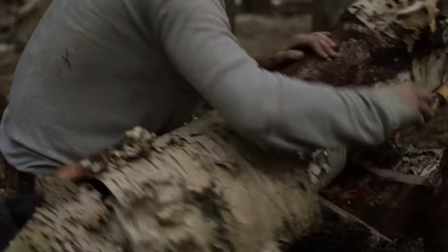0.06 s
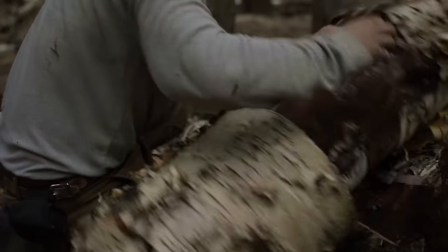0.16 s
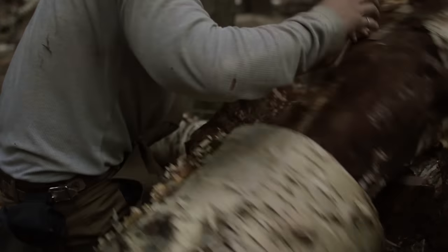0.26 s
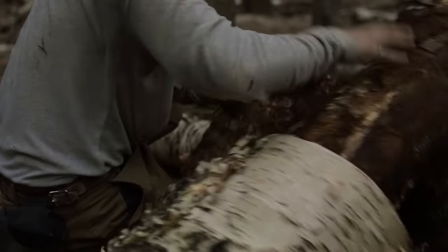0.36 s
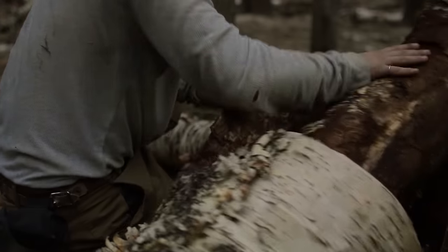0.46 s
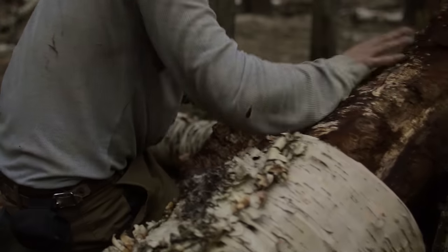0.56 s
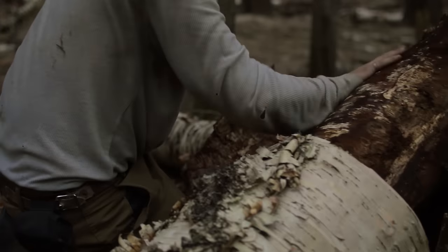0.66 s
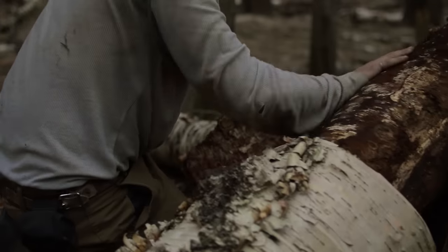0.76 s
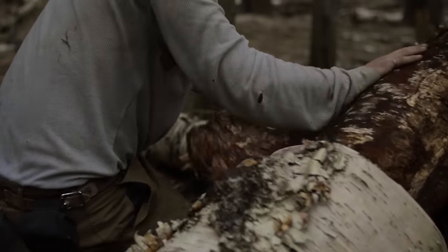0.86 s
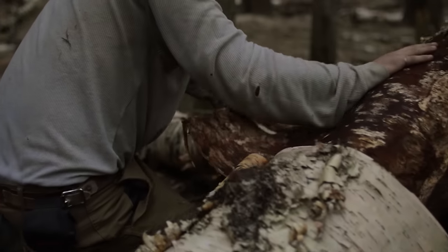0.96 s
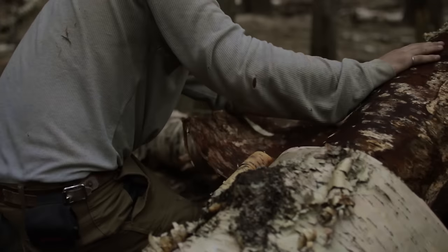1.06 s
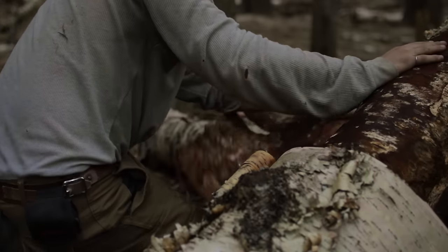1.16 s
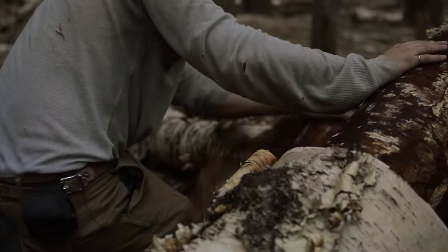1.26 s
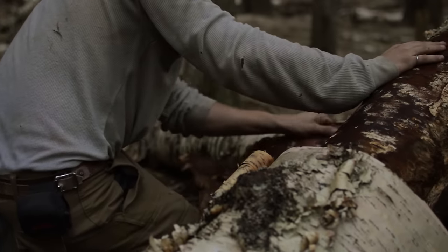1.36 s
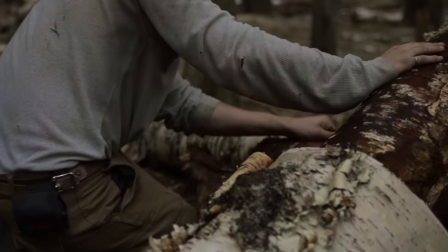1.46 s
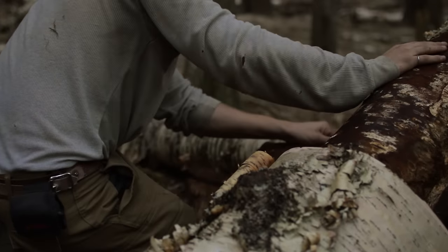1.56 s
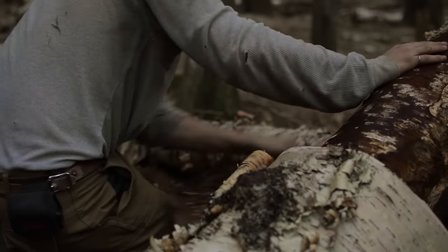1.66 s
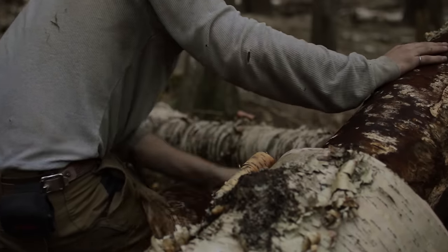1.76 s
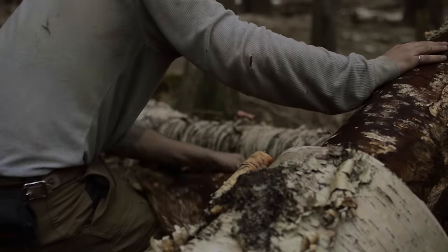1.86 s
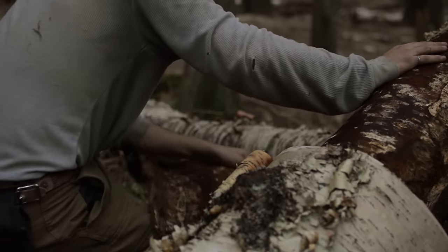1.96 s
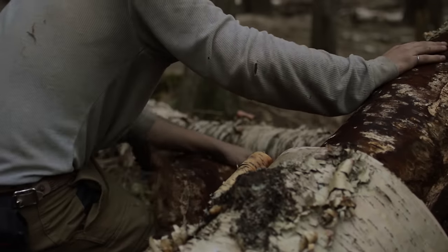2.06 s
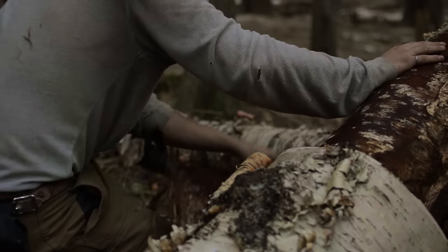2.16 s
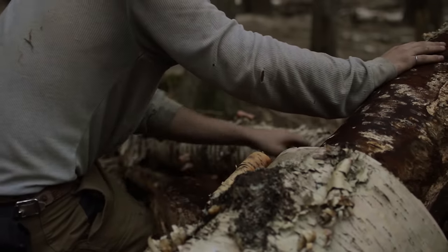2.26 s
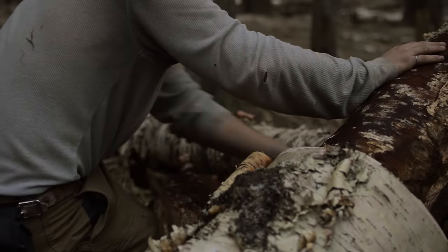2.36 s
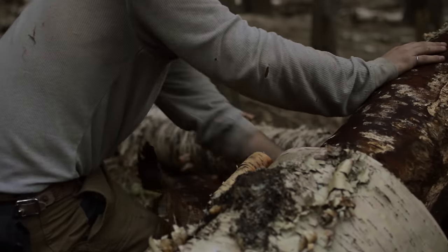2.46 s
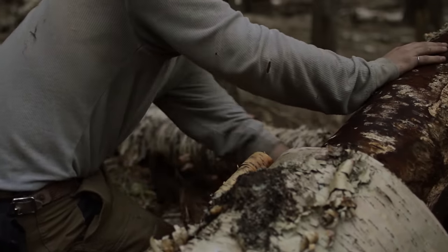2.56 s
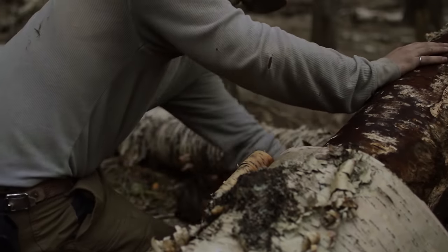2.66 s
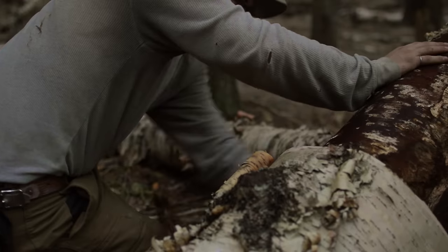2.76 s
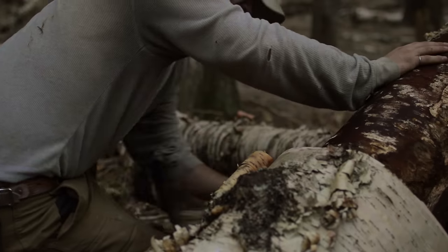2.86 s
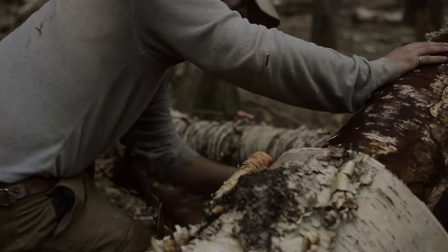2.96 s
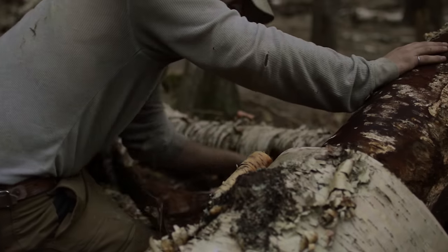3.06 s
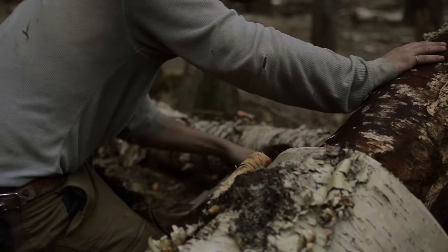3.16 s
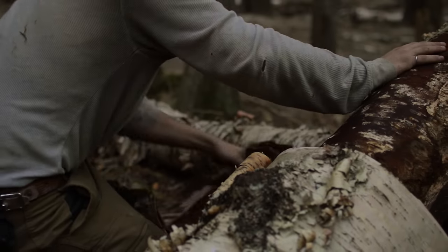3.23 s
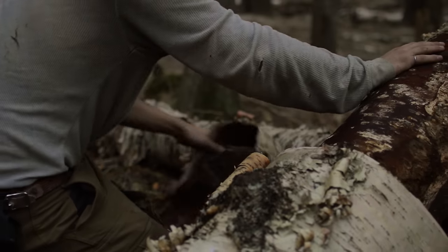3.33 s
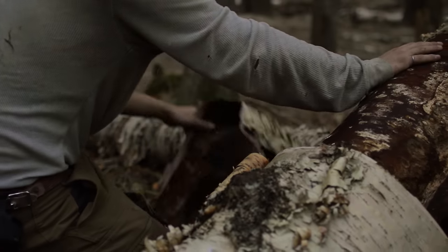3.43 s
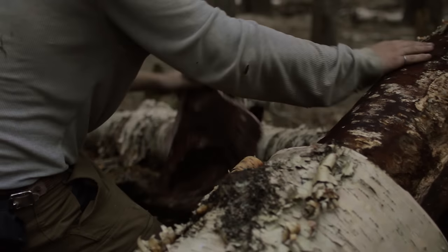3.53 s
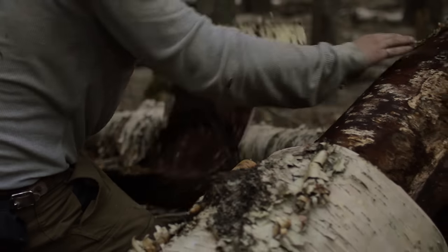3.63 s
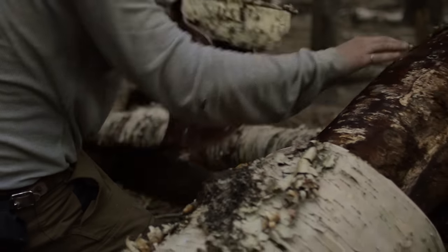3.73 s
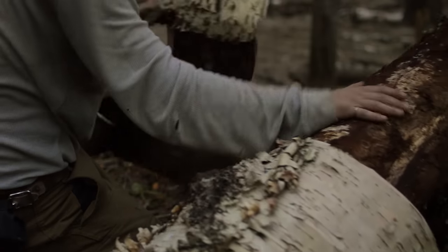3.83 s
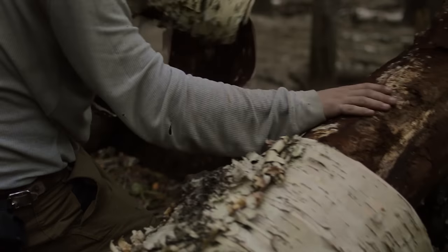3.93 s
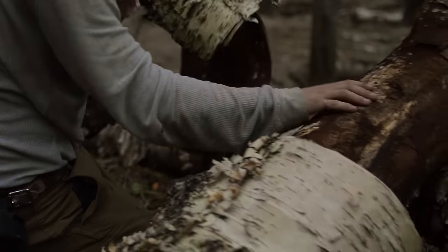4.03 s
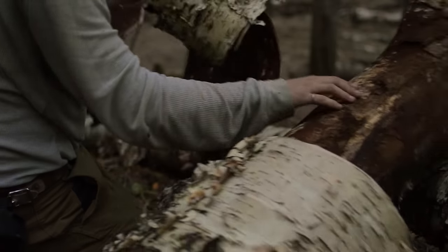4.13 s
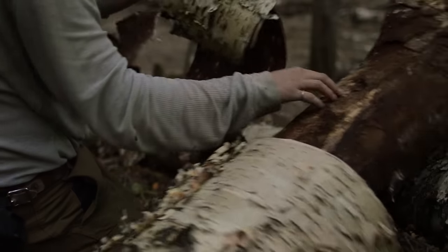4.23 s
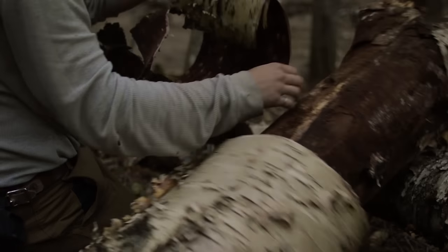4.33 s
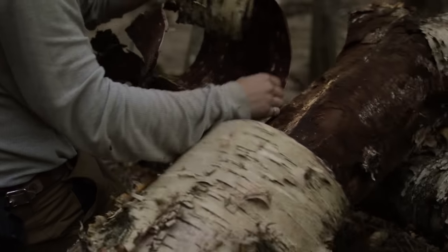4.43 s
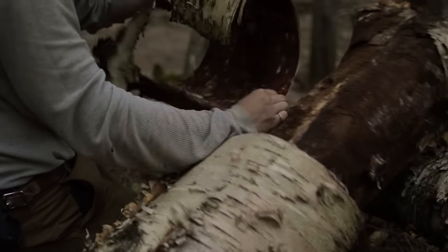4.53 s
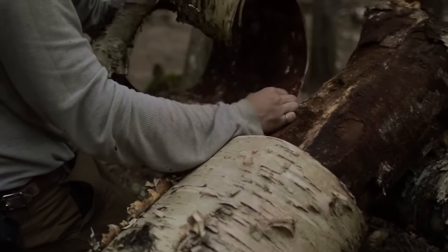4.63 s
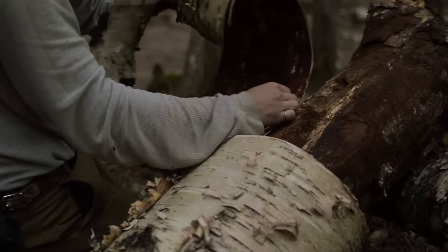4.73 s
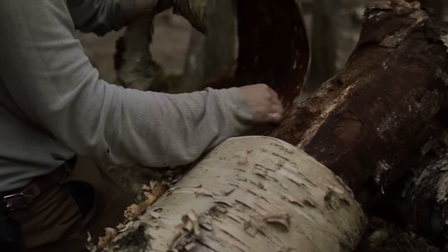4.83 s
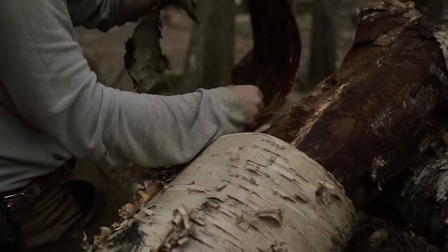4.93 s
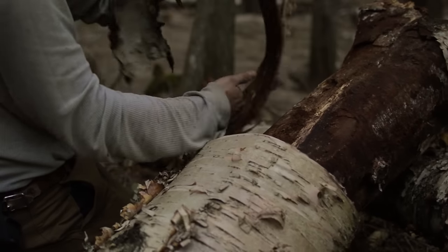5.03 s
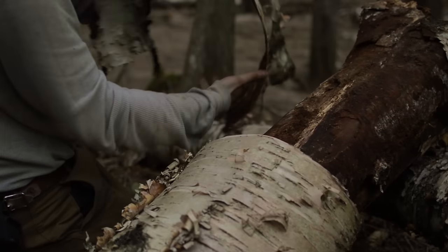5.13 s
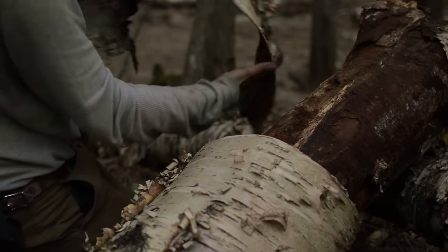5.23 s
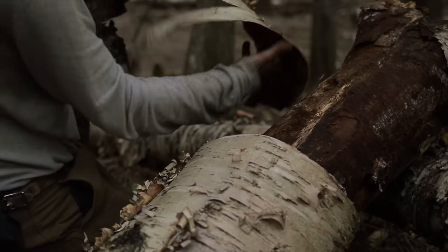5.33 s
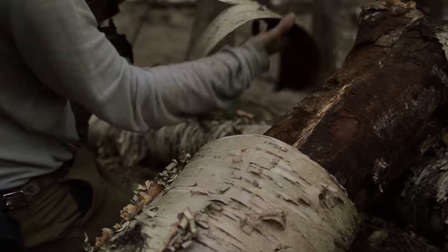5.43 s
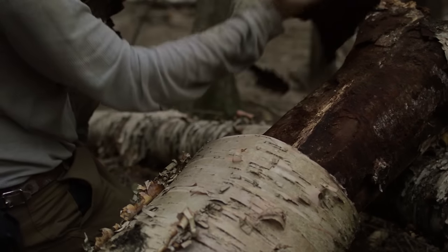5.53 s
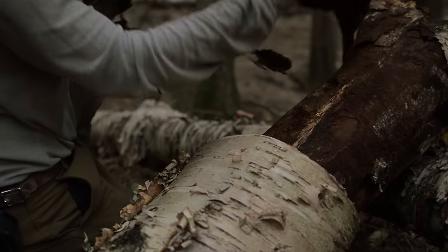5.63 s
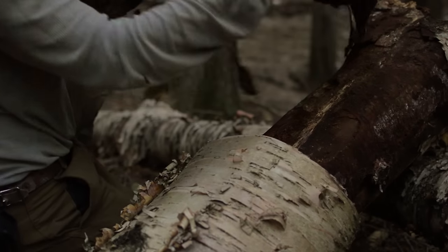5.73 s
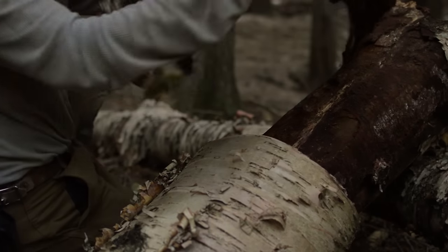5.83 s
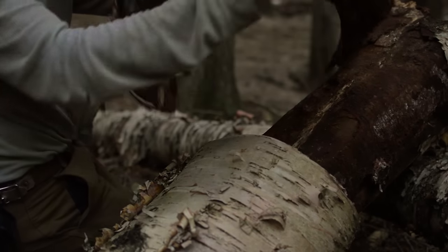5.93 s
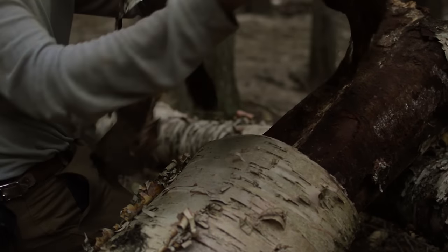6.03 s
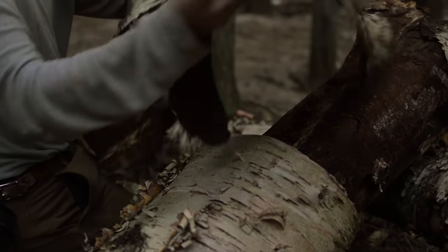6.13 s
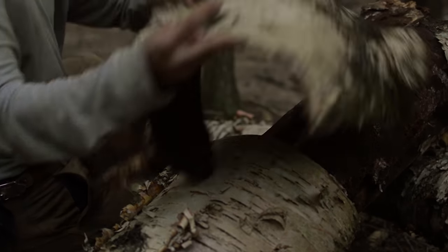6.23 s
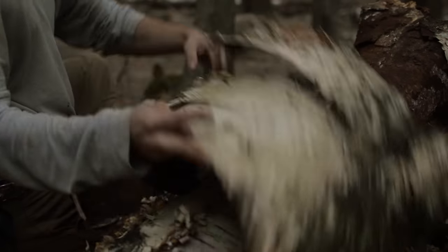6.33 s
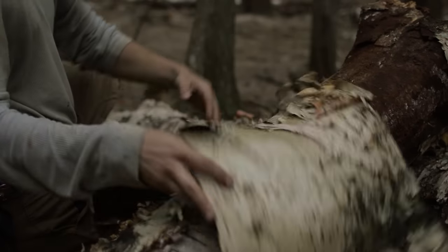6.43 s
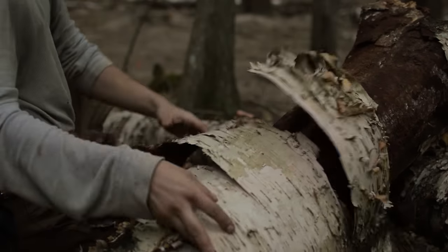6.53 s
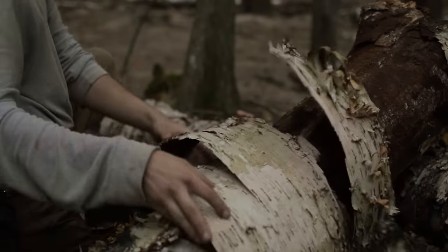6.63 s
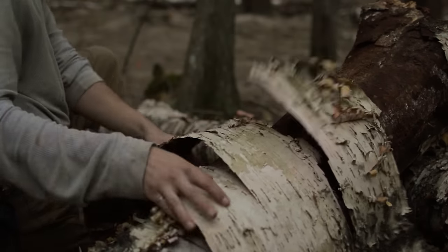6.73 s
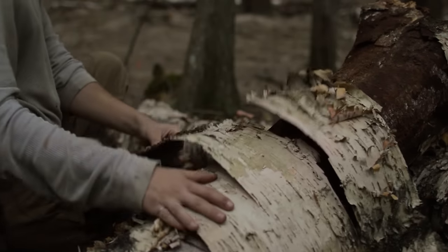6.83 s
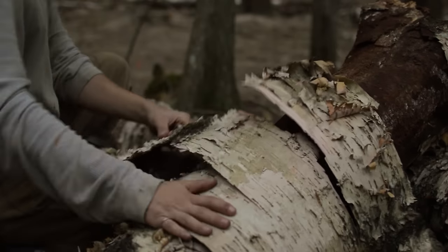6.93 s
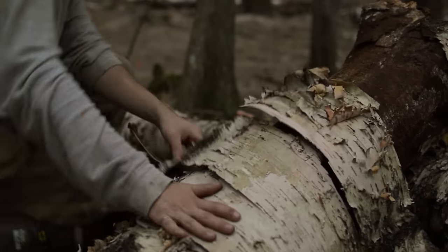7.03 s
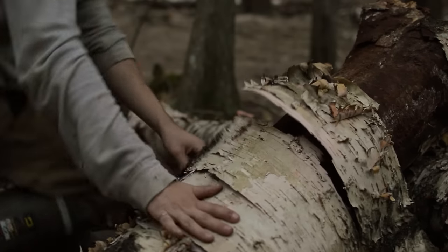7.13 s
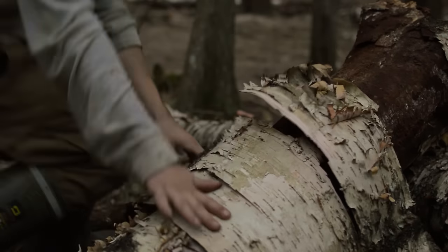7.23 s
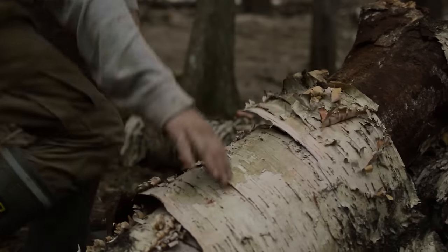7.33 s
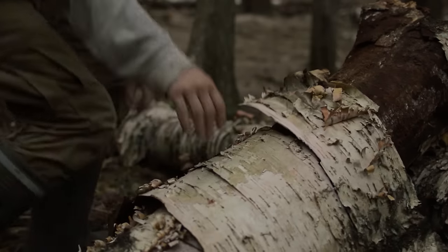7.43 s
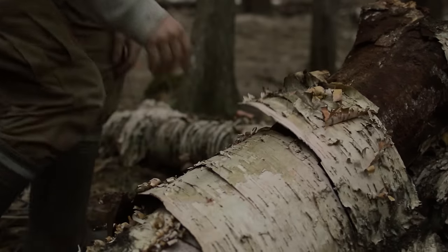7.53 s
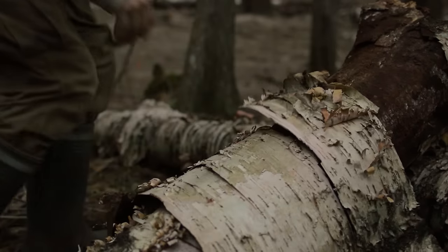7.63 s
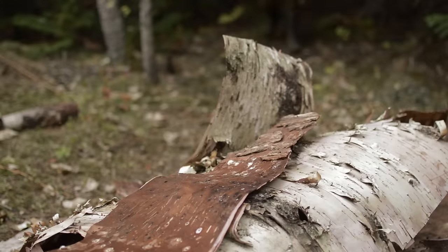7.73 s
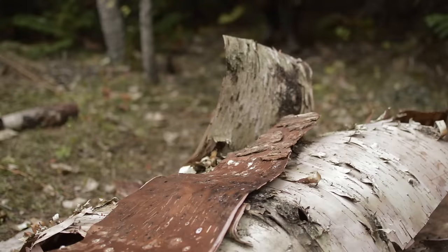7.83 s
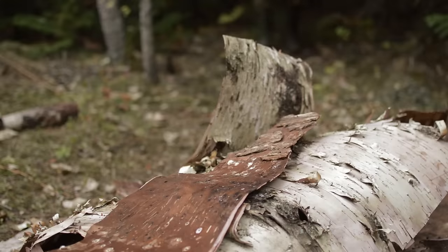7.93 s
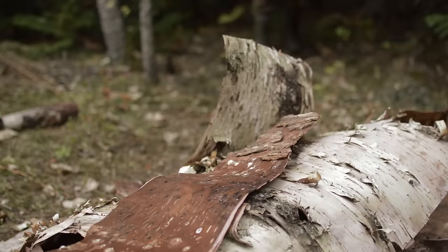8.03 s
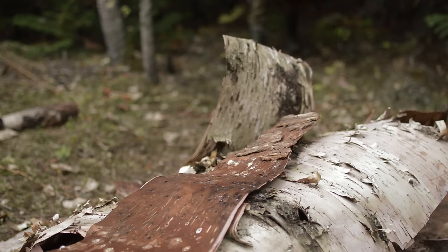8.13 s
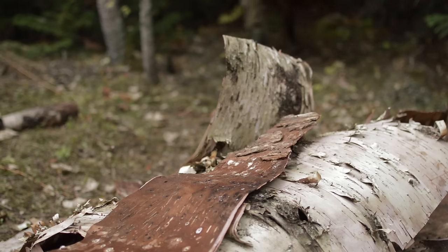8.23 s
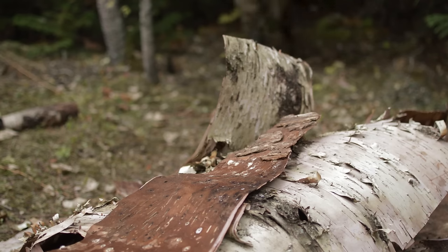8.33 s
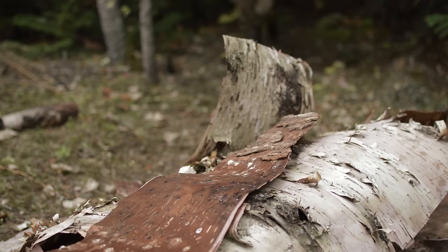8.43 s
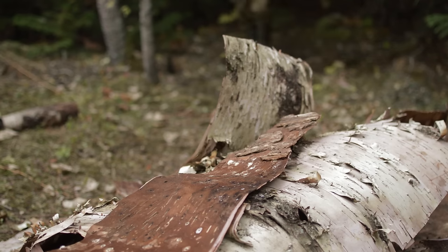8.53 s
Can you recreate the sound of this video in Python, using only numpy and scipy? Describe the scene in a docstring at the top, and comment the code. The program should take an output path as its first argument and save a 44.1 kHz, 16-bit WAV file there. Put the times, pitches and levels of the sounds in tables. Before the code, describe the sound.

Dry bark flexes and crackles in uneven pulls, with woody knocks and thuds as thick pieces break off. The densest cracking comes early; afterwards there are sharp ticks, fibre rips and short squeaks, then sparse rustling. Later a stiff sheet scrapes briefly and lands sliding on other bark, followed by light crinkles. Close mono outdoor sound, mostly dry, with a faint airy echo from trees and soft still air.

```python
"""Quiet woods: dry birch bark is pried and torn off a dead log by hand, close to one microphone.
The bending sheet crinkles as random tiny fractures ring bands of noise; papery flakes snap as filtered ticks.
Thick bark cracks off as ringing modes, thuds and splinter noise; fibres rip in flurries and slipping edges squeak.
The curled sheet scrapes along the trunk and slides onto a pile as jolts ring its resonances.
Log, ground and trees give a faint noise echo, over the still air of the woods."""
import sys
import numpy as np
from scipy import signal
from scipy.fft import rfft, irfft
from scipy.io import wavfile
from scipy.ndimage import uniform_filter1d

SR = 44100
rng = np.random.default_rng(int(sys.argv[2]) if len(sys.argv) > 2 else 0)


def wav_out(sig):
    """Save sig, one row per channel (or a flat mono array), as 16-bit PCM at SR to the path in sys.argv[1]."""
    wavfile.write(sys.argv[1], SR, np.round(np.clip(np.atleast_2d(sig).T, -1, 1) * 32767).astype(np.int16))


N = 378378
TIME = np.arange(N) / SR
HIT_SIZE = 4096  # samples in one short hit
AGE = np.arange(HIT_SIZE) / SR  # seconds since the start of a hit

# colour of splintering fibres: [f/Hz, relative level/dB]
SPLINTER_COLOUR = [(300, -41), (1300, 7.5), (2600, 4), (5500, 1.5), (9500, 3.5), (12000, -6), (16000, -31)]
# colour of papery flakes and grit: [f/Hz, relative level/dB]
FLAKE_COLOUR = [(150, -25), (700, 2.5), (1500, 1.5), (4000, 5), (9500, 8.5), (12000, 0), (16000, -26)]


def undb(db):
    """Decibels to gain."""
    return 10 ** (np.asarray(db) / 20)


def curve(rows, axis=1):
    """Gain over time from one dB column of a table."""
    rows = np.array(rows, float)
    return undb(np.interp(TIME, rows[:, 0], rows[:, axis]))


def unit(x):
    """Scale to rms 1."""
    return x / np.sqrt(np.mean(x ** 2))


def burst(x):
    """Scale a hit to the energy of 10 ms at rms 1."""
    return x * np.sqrt(.01 * SR / np.sum(x ** 2))


def gain_at(points, hz):
    """Read a colour on a log-frequency axis."""
    f, db = np.transpose(points)
    return undb(np.interp(np.log(hz + 1), np.log(f), db))


def colour(x, points, size=1024):
    """Causal minimum-phase filter with the given colour, so that attacks stay sharp."""
    bins_hz = np.arange(size // 2 + 1) * SR / size
    cepstrum = irfft(np.log(gain_at(points, bins_hz)))
    # fold the cepstrum onto positive time
    cepstrum[1:size // 2] *= 2
    cepstrum[size // 2 + 1:] = 0
    impulse = irfft(np.exp(rfft(cepstrum)))
    return signal.fftconvolve(x, impulse)[:len(x)]


def resonate(x, hz, width):
    """One resonance, gain 1 at its centre; width in Hz."""
    return signal.lfilter(*signal.iirpeak(hz, hz / width, fs=SR), x)


def fade(t, t60):
    """Exponential decay, down 60 dB after t60 seconds."""
    return np.exp(-np.log(1000) * t / t60)


def walk(rate):
    """Random wandering: straight lines between random points, rate of them a second."""
    steps = rng.standard_normal(2048)
    return np.interp(TIME * rate, np.arange(len(steps)), steps)


def add(track, s, sound):
    """Mix a sound into the track at time s."""
    i = int(s * SR)
    track[i:i + len(sound)] += sound[:N - i]


def fractures(rate, spread_db, even_s):
    """Energy of random tiny breaks of uneven strength, rate a second; the steady hand evens out their mean."""
    chance = rng.random(N)
    strength = np.minimum(rng.exponential(size=N), 3.4)
    energy = (chance < rate / SR) * undb(spread_db * strength) ** 2
    width = int(even_s * SR)
    mean = uniform_filter1d(uniform_filter1d(energy, width), width)
    return energy / np.maximum(mean, 1e-6)


def crinkle(ring_cycles=6, tint_db=6.0, shift_db=3.5):
    """Tiny fractures ring the sheet, each with its own colour, over the smooth rub of bark on bark."""
    # how the bark is held: [t/s, rumble passed into the log/dB, smooth sliding against crackling/dB]
    contact = [(0, -2, 1.5), (.9, 2, -3.5), (1.25, 6.5, 2), (1.8, 7, -1.5), (2.9, 6, 0), (4.0, -5, -1),
               (5.2, -3, 0.5), (6.0, -4, 0.5), (7.4, -5.5, 0.5)]
    # colour of the crinkling sheet: [f/Hz, relative level per Hz/dB]
    sheet_colour = [(80, -25), (170, -5), (280, -9.5), (450, -1), (800, 1.5), (1400, 0.5), (2500, -7),
                    (5000, -9), (9500, -5), (11500, -15), (15500, -64)]
    energy = fractures(rate=520, spread_db=5.0, even_s=0.071)
    at = np.flatnonzero(energy)
    skin_t60 = .003  # seconds
    rumble = curve(contact, axis=1)
    sliding = curve(contact, axis=2) ** 2  # as power
    zones = np.zeros((2, N))  # sheet below, papery skin above
    for hz in 70 * 2 ** (np.arange(24) / 3):  # third-octave bands
        edges = hz * 2 ** (np.array([-1, 1]) / 6)
        band_filter = signal.butter(2, edges, "band", fs=SR, output="sos")
        noise = unit(signal.sosfilt(band_filter, rng.standard_normal(N)))
        tints = rng.standard_normal(HIT_SIZE).clip(-2, 2)
        tinted = energy.copy()
        tinted[at] *= undb(tint_db * np.resize(tints, len(at))) ** 2
        # low bands ring longer than the papery treble; energy fades twice as fast as amplitude
        decay = fade(2 / SR, skin_t60 + ring_cycles / hz)
        ringing = signal.lfilter([1], [1, -decay], tinted)
        grain = np.sqrt((ringing / ringing.mean() + sliding) / (1 + sliding))
        # the resonances of the sheet shift as it bends
        band = unit(noise * grain * undb(shift_db * walk(28)))
        # bark still fast on the log passes its lows into the wood, which damps its highest fizz
        coupling = 1 / (1 + (hz / 480) ** 4) - (hz > 10000) / 2
        band_gain = gain_at(sheet_colour, hz) * np.sqrt(hz)  # a wider band holds more energy
        zones[int(hz > 2600)] += band * band_gain * rumble ** coupling
    sheet = unit(zones[0]) * effort(axis=0)
    skin = unit(zones[1]) * effort(axis=1)
    return sheet + skin


def effort(axis):
    """Gain of the sheet (0) or its skin (1): each pull takes hold, strains and lets go, over a faint settling."""
    # pulls and shoves of the hand: [t/s, length/s, flexing of the sheet/dB, crackle of the papery skin/dB,
    # growth of the strain over the pull/dB]
    pulls = [(0.007, 0.17, -37.5, -37, 6), (0.232, 0.16, -30, -30.5, 1.5), (0.437, 0.16, -35, -40, -2.5),
             (0.706, 0.033, -35.5, -42, -3), (0.865, 0.34, -38.5, -38.5, -3.5),
             (1.256, 0.093, -27, -30.5, -5), (1.613, 0.038, -43, -39.5, 1), (1.689, .185, -25.5, -28.5, 2),
             (1.963, 0.022, -26.5, -32, -4), (2.033, 0.31, -44, -43.5, -0.5),
             (2.516, 0.22, -37.5, -36, 7.5), (2.789, 0.14, -27, -27, -1), (2.951, 0.04, -28.5, -23.5, 8),
             (3.048, .25, -38.5, -38.5, 1.5), (3.367, 0.089, -38.5, -33.5, 7.5),
             (3.583, 0.09, -39.5, -37.5, -6), (3.833, 0.64, -45.5, -43.5, -3), (4.314, 0.36, -36.5, -39, 4),
             (4.927, 0.042, -58, -41.5, -4), (5.316, 0.14, -41, -42, -4), (5.715, .27, -39.5, -39, 5),
             (6.032, .06, -33.5, -34, 1), (6.214, .09, -39.5, -33.5, -3), (6.32, 0.1, -30.5, -31, -5),
             (6.458, 0.094, -24.5, -28, 3), (6.637, 0.18, -41.5, -38, -1.5), (6.853, 0.12, -35, -32.5, 3),
             (7.064, 0.014, -35, -31, 3), (7.189, .19, -38.5, -36, -1), (7.471, 0.058, -49, -44, 3),
             (7.71, 0.039, -61, -49.5, 3), (7.906, 0.067, -61, -47.5, 5)]
    # settling between pulls: sheet, then skin [level/dB]
    rest_db = [-49.5, -49.5]
    # the hand takes up the strain quickly; the sheet relaxes more slowly (time constants)
    attack_s, release_s = 0.022, 0.044
    # from here the settling dies away, with this time constant
    let_go_s, settle_s = 7.17, 1
    settling = np.exp(-np.maximum(TIME - let_go_s, 0) / settle_s)
    power = (undb(rest_db[axis]) * settling) ** 2
    for s, length_s, sheet_db, skin_db, growth_db in pulls:
        early = np.maximum(s - TIME, 0)
        late = np.maximum(TIME - s - length_s, 0)
        progress = np.clip((TIME - s) / length_s, 0, 1)
        strain_db = growth_db * (progress - .5)
        grip = np.exp(-np.minimum(early / attack_s + late / release_s, 20))
        level_db = (sheet_db, skin_db)[axis]
        power = power + (undb(level_db + strain_db) * grip) ** 2
    return np.sqrt(power)


def cracks(ring_t60=0.013, body_t60=0.031, splinter_t60=0.024, trail_db=-15, ring_db=-2.5, lower_db=-9,
           body_db=-5, body_width=0.93):
    """A break runs through the bark: the freed piece rings, its surroundings thud and splinters spray."""
    # thick bark breaking or knocking: [t/s, level before the ring and body trims/dB, pitch of the freed
    # piece/Hz, splinter level/dB]; the row at 1.7864 s is instead an edge squeaking as it slips (pitch of the
    # squeak), with a spray of splinters
    breaks = [(0.2968, -19, 744, -43), (0.705, -32, 1430, -33.5), (1.073, -26, 1390, -47),
              (1.193, -19, 488, -37), (1.203, -23, 257, -29.5), (1.2422, -12, 620, -14),
              (1.259, -15.5, 556, -14.5), (1.268, -18.5, 720, -18), (1.667, -21.5, 360, -27),
              (1.677, -28.5, 312, -27), (1.6902, -10, 406, -19), (1.7268, -14.5, 1160, -31),
              (1.7378, -26, 1140, -22.5), (1.7534, -12.5, 514, -19.5), (1.772, -18, 550, -22),
              (1.7864, -11, 2150, -19), (1.8256, -16.5, 1000, -19.5), (1.8342, -13, 1050, -16),
              (1.8512, -9, 526, -13), (1.868, -8.5, 940, -17), (1.875, -6.5, 780, -12.5),
              (1.8829, -17, 1230, -37), (1.9546, -18, 1700, -16.5), (1.9808, -17, 860, -23.5),
              (2.337, -23.5, 415, -38), (2.655, -26.5, 457, -40), (2.808, -15.5, 1360, -15.5),
              (2.8244, -26, 1230, -37), (3.061, -30, 485, -28), (3.213, -29, 415, -29.5),
              (3.298, -35, 1650, -33), (3.381, -29, 1573, -33), (3.8781, -27.5, 955, -34.5),
              (5.3273, -32, 1080, -38), (6.031, -24, 800, -27), (6.1398, -35, 1290, -31),
              (6.2757, -27.5, 635, -52), (7.1941, -29.5, 764, -48)]
    # colour of the thud: [f/Hz, relative level/dB]
    body_colour = [(40, -16), (150, 1), (450, -2), (1500, 1.5), (2400, -2), (4000, -13), (9000, -36)]
    # a crack of break_db runs for break_s; the time halves for every halving_db more
    break_db, break_s, halving_db = -20, 0.0021, 21
    out = np.zeros(N)
    for s, db, hz, spray_db in breaks:
        run_s = break_s * 2 ** ((break_db - db) / halving_db)
        growth = np.minimum(AGE / run_s, 1)
        after = np.maximum(AGE - run_s, 0)
        noise = rng.standard_normal((3, HIT_SIZE))
        # a curved plate has a second bending mode about an octave down
        phase = 2 * np.pi * hz * AGE
        modes = np.sin(phase) + undb(lower_db) * np.sin(0.54 * phase)
        ring = modes * growth * fade(after, ring_t60)
        # a big piece thuds deep, a small one clacks
        push = noise[0] * growth * fade(after, body_t60)
        body = colour(resonate(push, hz, body_width * hz), body_colour)
        # most fibres let go as the break runs, a few trail after it; each is a spike
        trail = undb(trail_db) * fade(after, 0.037)
        parting = np.sqrt(growth) * (fade(after, splinter_t60) + trail)
        spikes = noise[1] * undb(3.9 * noise[2])
        spray = colour(spikes * parting, SPLINTER_COLOUR)
        thud = undb(ring_db) * burst(ring) + undb(body_db) * burst(body)
        add(out, s, undb(db) * thud + undb(spray_db) * burst(spray))
    return out


def snaps(flutter_db=-24, flake_db=-3, broad_db=-1, damping=0.12):
    """A flake parts with one sharp tick, then flutters faintly round its own pitch."""
    # the louder flakes snapping: [t/s, level before the broad and flake trims/dB, pitch of the flake/Hz]
    flakes = [(0.2206, -26.5, 6700), (0.2716, -27.5, 1180), (0.333, -24, 6330), (0.351, -24.5, 1200),
              (0.5505, -27.5, 6000), (0.667, -34.5, 1600), (0.8102, -39.5, 9450), (0.9165, -32, 7300),
              (0.9405, -27.5, 3160), (0.96, -30, 7200), (0.9883, -23, 1520), (1.062, -35, 1150),
              (1.0979, -29.5, 6500), (2.1687, -38, 3100), (2.8528, -22.5, 4200), (2.8959, -18.5, 1970),
              (3.27, -31, 4270), (3.424, -34, 3300), (4.3596, -33.5, 4500), (4.5475, -28.5, 8840),
              (5.089, -38.5, 1920), (5.1093, -39, 2400), (5.14, -38.5, 5800), (5.2712, -32, 4840),
              (5.678, -38.5, 10100), (6.165, -26, 9900), (6.9545, -29, 10100), (8.0745, -46.5, 5400)]
    out = np.zeros(N)
    tick = fade(AGE, .0055) * np.minimum(AGE / .0007, 1)
    flutter = fade(AGE, .02)
    for s, db, hz in flakes:
        push = rng.standard_normal(HIT_SIZE) * (tick + undb(flutter_db) * flutter)
        click = colour(push, FLAKE_COLOUR)
        flake = resonate(click, hz, damping * hz)
        snap = undb(broad_db) * burst(click) + undb(flake_db) * burst(flake)
        add(out, s, undb(db) * snap)
    return out


def rips():
    """A run of fibres gives way in a flurry of noise that swells and dies."""
    # short rips through the papery skin: [t at the middle/s, level/dB, half length/s]
    flurries = [(0.087, -25.5, 0.0023), (.1182, -24, 0.0031), (0.153, -28, .004), (2.7904, -19, 0.0026),
                (3.014, -20, 0.0033), (6.328, -20, 0.011), (6.396, -27, 0.0092), (6.858, -24.5, 0.0072),
                (6.936, -24, 0.0072), (7.069, -27, 0.003), (7.079, -34, 0.004)]
    out = np.zeros(N)
    middle = AGE.mean()
    for s, db, half_s in flurries:
        swell = np.exp(-((AGE - middle) / half_s) ** 2)
        flurry = rng.standard_normal(HIT_SIZE) * swell
        add(out, s - middle, undb(db) * burst(colour(flurry, SPLINTER_COLOUR)))
    return out


def squeaks(swell_s=0.0049, t60=0.034, lower_db=-7):
    """A slipping edge pumps two bending modes for a moment, then lets them ring out."""
    # an edge of bark squeaking as it slips: [t/s, level/dB, pitch/Hz]
    slips = [(2.2845, -22, 2190), (2.863, -21, 2230), (7.383, -35, 2820)]
    out = np.zeros(N)
    swell = np.minimum(AGE / swell_s, 1) ** 2
    ring_out = fade(np.maximum(AGE - swell_s, 0), t60)
    for s, db, hz in slips:
        phase = 2 * np.pi * hz * AGE
        modes = np.sin(phase) + undb(lower_db) * np.sin(.54 * phase)
        add(out, s, undb(db) * burst(modes * swell * ring_out))
    return out


def drag(levels, modes, slip_rate, grit_db):
    """Stick-slip jolts ring the resonances of the curled sheet, which is too light to give off deep bass."""
    energy = fractures(slip_rate, spread_db=-1.0, even_s=0.029)
    slips = np.sqrt(energy) * rng.choice([-1, 1], N)
    ring = sum(undb(db) * resonate(slips, hz, width) for hz, width, db in modes)
    ring = signal.sosfilt(signal.butter(1, 150, "high", fs=SR, output="sos"), ring)
    grit = unit(colour(slips, FLAKE_COLOUR))
    moving = (TIME > levels[0][0]) & (TIME < levels[-1][0])
    return (unit(ring) + undb(grit_db) * grit) * curve(levels) * moving


def forest(dry, near_db=-13, near_t60=0.028, far_db=-23, far_t60=0.81):
    """Log and ground scatter the sound almost at once; the trunks return a faint, airy tail."""
    t = TIME[:SR // 2]
    near, far = rng.standard_normal((2, len(t)))
    # echo colours: (f/Hz, relative level/dB)
    near = colour(near * fade(t, near_t60) * (t > .004), [(200, -3.5), (2000, 1.0), (10000, 4.0)])
    far = colour(far * fade(t, far_t60) * (t > .02), [(150, -9), (1200, -9.0), (10000, -1.0)])
    near_echo = undb(near_db) * near / np.linalg.norm(near)
    far_echo = undb(far_db) * far / np.linalg.norm(far)
    return dry + signal.fftconvolve(dry, near_echo + far_echo)[:N]


def woods(level_db=-51):
    """Still air in the trees: coloured noise, swelling slightly."""
    # colour of the air: [f/Hz, relative level/dB]
    air_colour = [(20, -5), (70, -1.5), (160, 1.5), (330, 0), (900, -3), (1800, -9), (4000, -13),
                  (9500, -15.5), (12500, -22), (16000, -28)]
    air = unit(colour(rng.standard_normal(N), air_colour))
    return air * undb(level_db + 0.16 * walk(1))


def scene():
    """All the sounds of the bark, echoed by the forest, over the air of the woods."""
    # the curled sheet dragged over the trunk: [t/s, level/dB]
    scrape_levels = [(5.44, -60), (5.462, -36), (5.474, -25), (5.49, -25), (5.512, -27.5), (5.528, -41),
                     (5.56, -60)]
    # the sheet sliding onto the pile: [t/s, level/dB]
    slide_levels = [(6.438, -42), (6.464, -14), (6.495, -26), (6.545, -26.5), (6.6, -47), (6.66, -60)]
    # resonances of the sheet held in the hand: [f/Hz, width/Hz, relative level/dB]
    held_modes = [(678, 21, 7), (950, 96, 0), (1270, 180, -5.5), (1545, 58, 6), (2390, 120, -20)]
    # resonances of the sheet lying on the pile: [f/Hz, width/Hz, relative level/dB]
    lying_modes = [(140, 170, -8.5), (540, 58, 3.5), (760, 95, 10), (1100, 110, 2.5), (1930, 140, -23)]
    scrape = drag(scrape_levels, held_modes, slip_rate=900, grit_db=-16.0)
    slide = drag(slide_levels, lying_modes, slip_rate=1400, grit_db=-6)
    bark = crinkle() + cracks() + snaps() + rips() + squeaks() + scrape + slide
    return (forest(bark) + woods())[None]


def record(dry, top_hz=15900):
    """The microphone passes no deep rumble; the recorder clips peaks at full scale and cuts the top."""
    thinned = signal.sosfilt(signal.butter(2, 45, "high", fs=SR, output="sos"), dry)
    clipped = np.clip(thinned, -1, 1)
    return signal.sosfilt(signal.ellip(8, .2, 70, top_hz, fs=SR, output="sos"), clipped)


dry = scene()
out = record(dry)
wav_out(out)
```